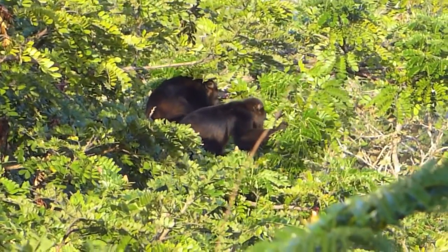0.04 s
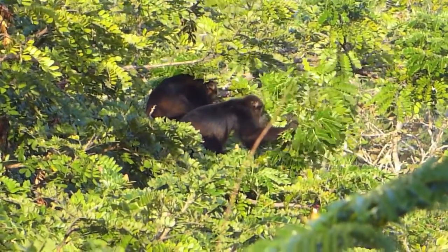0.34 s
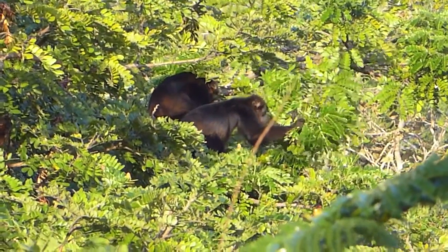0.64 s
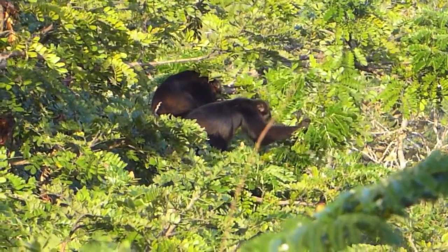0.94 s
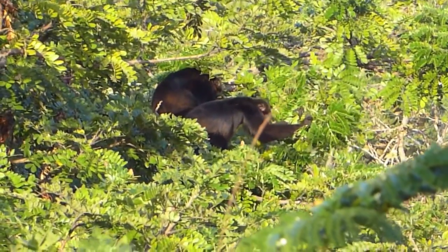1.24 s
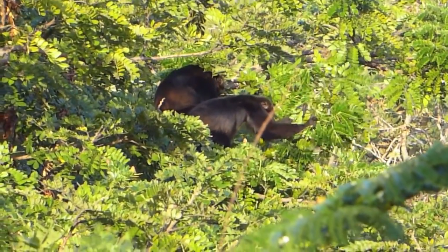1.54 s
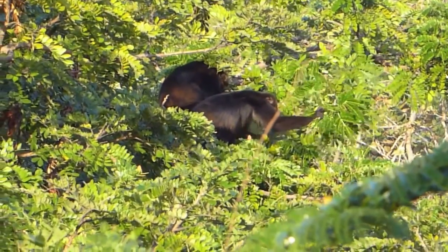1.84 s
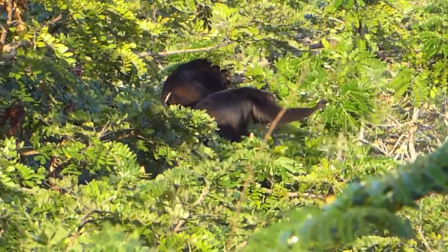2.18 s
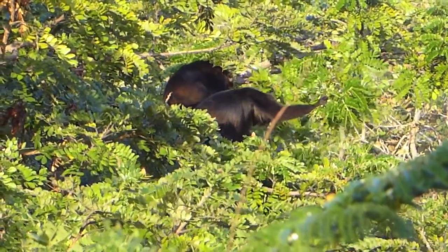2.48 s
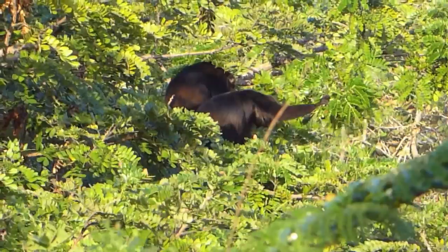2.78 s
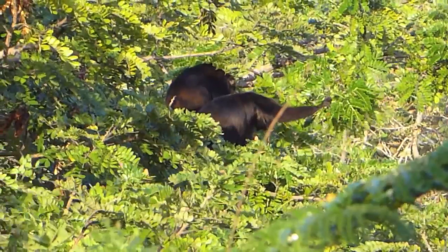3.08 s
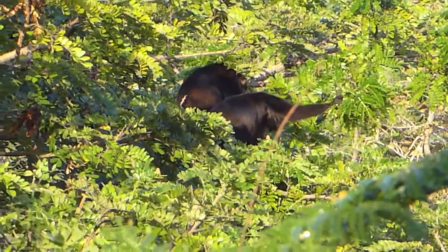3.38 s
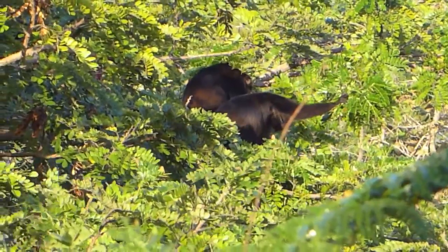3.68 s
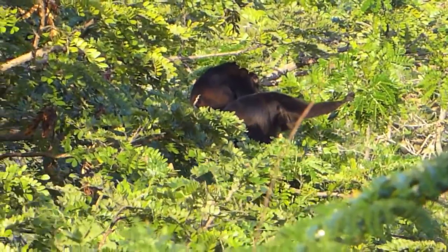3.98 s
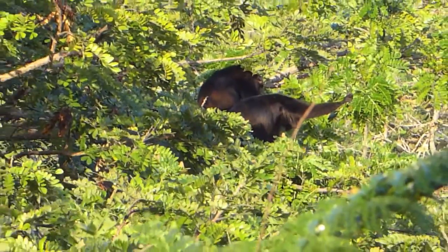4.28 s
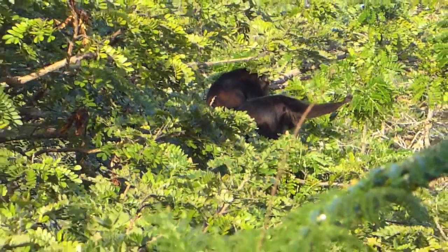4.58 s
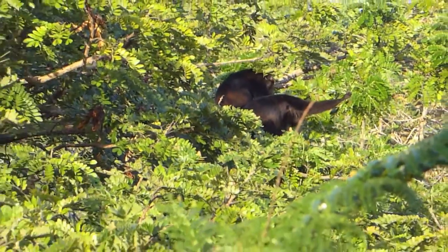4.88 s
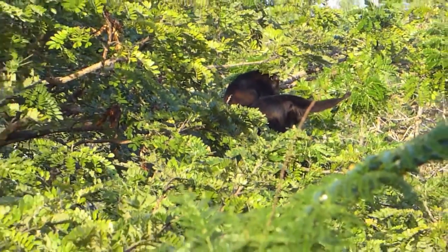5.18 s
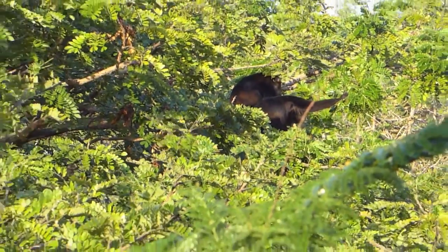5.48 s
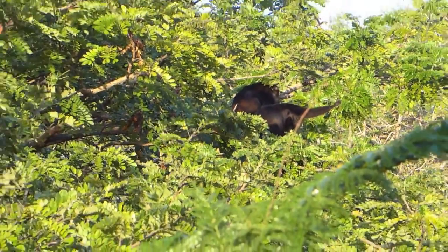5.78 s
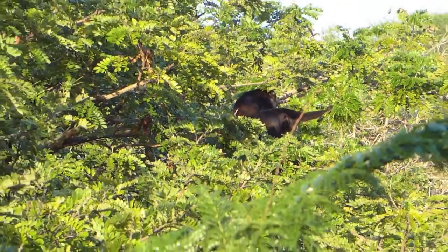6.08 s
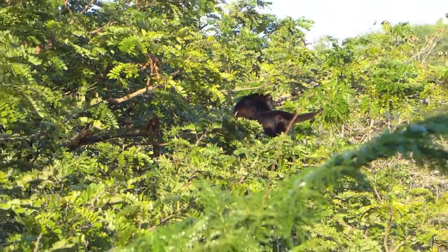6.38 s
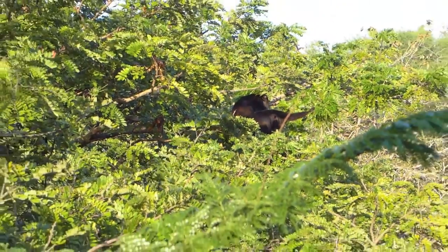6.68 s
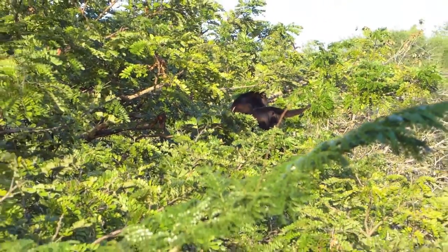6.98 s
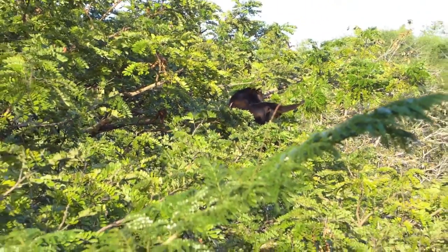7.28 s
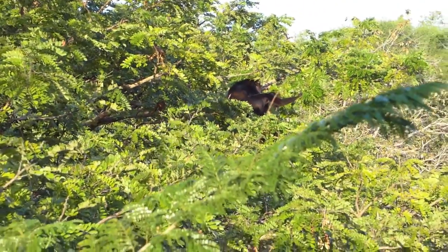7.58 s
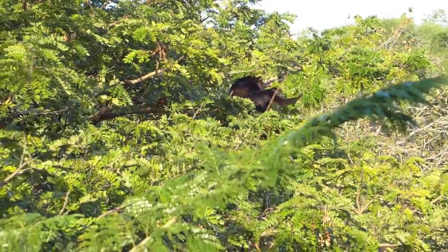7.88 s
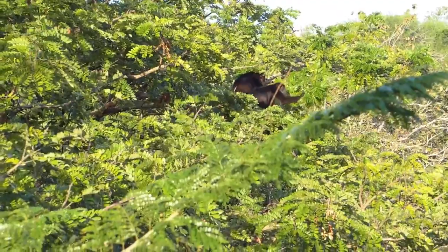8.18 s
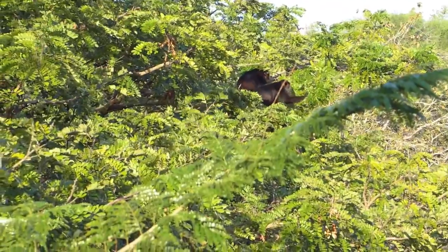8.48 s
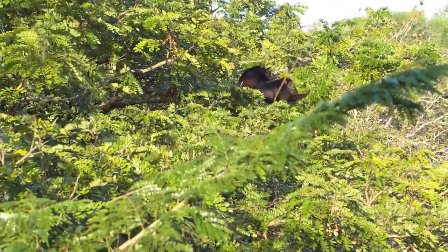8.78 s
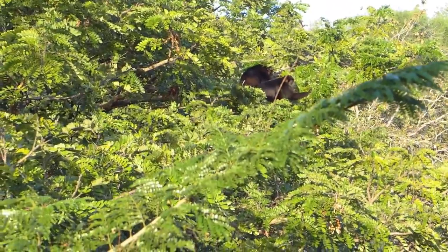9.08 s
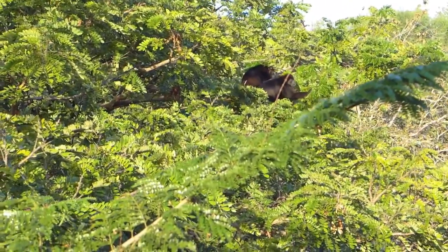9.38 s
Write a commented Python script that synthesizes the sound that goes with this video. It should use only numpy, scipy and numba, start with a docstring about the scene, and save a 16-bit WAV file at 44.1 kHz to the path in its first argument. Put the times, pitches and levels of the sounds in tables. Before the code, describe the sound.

Howler monkeys roar straight ahead from the start, in hoarse, rasping pushes about half a second apart, with falling whoops between them and wavering throat tones inside. The roars are strongest from about 1.5 to 3 seconds, then break into short grunts that spread out until 6 seconds. From 6.5 to 8.5 seconds only weak grunts and faint moans remain; a few firmer grunts return around 9 seconds. A soft breeze stirs the leaves throughout, swelling around 4 to 7 seconds. A faint, high insect buzz comes and goes. Dry twigs snap now and then, most clearly near 4.8, 5.9, 6.4 and 9.1 seconds. A distant bird repeats a short rising whistle from about 3.7 seconds, another chips twice, and faint twittering runs come at about 8 and 9 seconds. The trees give everything a short, diffuse echo.

```python
"""Howler monkeys roar from a treetop: one long hoarse bout that breaks up into single grunts.
Chaotic vocal-fold pulses ring the throat sac and the mouth; rushing air rasps in the upper tract.
Clear throat tones waver within the roars, some softer ones whine through the nose, and falling
whoops and a few faint moans come in between. Around them a breeze stirs the leaves, insects shrill
and buzz, twigs snap and small birds call. Trunks and foliage scatter a short echo."""
import sys
import numpy as np
from scipy import signal
from scipy.fft import rfft, irfft, next_fast_len
from scipy.io import wavfile
from scipy.ndimage import uniform_filter1d
from numba import njit

SR = 44100
rng = np.random.default_rng(int(sys.argv[2]) if len(sys.argv) > 2 else 0)


def wav_out(sig):
    """Save sig, one row per channel (or a flat mono array), as 16-bit PCM at SR to the path in sys.argv[1]."""
    wavfile.write(sys.argv[1], SR, np.round(np.clip(np.atleast_2d(sig).T, -1, 1) * 32767).astype(np.int16))


N = 416744
T = np.arange(N) / SR
SIDE = np.array([[1], [-1]])  # left, right in antiphase


def undb(db):
    """Decibels to gain."""
    return 10 ** (np.asarray(db) / 20)


def curves(table):
    """Table columns, linearly interpolated over the first (time)."""
    times, *columns = np.transpose(table)
    return [np.interp(T, times, column) for column in columns]


def unit(x):
    """Scale to rms 1."""
    return x / np.sqrt(np.mean(x ** 2) + 1e-18)


def steady(x, span_s):
    """Level to rms 1 over each span; faster roughness stays."""
    size = max(int(span_s * SR), 2)
    power = uniform_filter1d(uniform_filter1d(x ** 2, size), size)
    return x / np.sqrt(np.abs(power) + 1e-14)


def walk(rate_hz):
    """Smooth random curve, rms 1."""
    points = rng.standard_normal(8192)
    line = np.interp(T * rate_hz, np.arange(len(points)), points)
    return unit(uniform_filter1d(line, max(int(SR / rate_hz / 2), 1)))


def gate(start, end, attack_s, release_s):
    """1 between two times, with rounded edges."""
    ramp = np.minimum((T - start) / attack_s, (end - T) / release_s) + .5
    return np.sin(np.pi / 2 * np.clip(ramp, 0, 1)) ** 2


def swell(start, end):
    """Sample indices and rounded envelope of an event."""
    at = np.arange(max(int(start * SR), 0), min(int(end * SR), N))
    return at, np.abs(np.sin(np.pi * (T[at] - start) / (end - start))) ** .7


@njit
def bandpass(x, hz, width_hz):
    """State-variable band-pass with a moving centre."""
    y, band_state, low_state = np.empty(len(x)), 0., 0.
    for i in range(len(x)):
        g = np.tan(np.pi * min(hz[i], .45 * SR) / SR)
        damping = width_hz / hz[i]
        band = (band_state + g * (x[i] - low_state)) / (1 + g * (g + damping))
        band_state = 2 * band - band_state
        low_state += 2 * g * band
        y[i] = damping * band
    return y


def ring(x, hz, width_hz):
    """Steep resonance: two band-passes in series, rms 1."""
    hz, width_hz = hz * np.ones(len(x)), float(width_hz)
    return unit(bandpass(bandpass(x, hz, width_hz), hz, width_hz))


def hisses(events, flicker_db=0, flicker_hz=81):
    """Swells of noise, each in its own resonance."""
    out = np.zeros(N)
    noise = rng.standard_normal(N) * undb(flicker_db * walk(flicker_hz))
    for start, end, hz, width_hz, db in events:
        at, shape = swell(start, end)
        out[at] += undb(db) * shape * ring(noise[at], hz, width_hz)
    return out


def tone(hz, waver):
    """Sine with unsteady pitch, rms 1."""
    return np.sqrt(2) * np.sin(2 * np.pi * np.cumsum(hz * (1 + waver)) / SR)


def glides(calls, jitter=.012, hoarse=.7, width_hz=160):
    """Wavering tones in a band of noise, passing through pitches evenly spaced in time."""
    out, waver, air = np.zeros(N), jitter * walk(150), rng.standard_normal(N)
    for start, end, *pitches, db in calls:
        at, shape = swell(start, end)
        hz = np.interp(T[at], np.linspace(start, end, len(pitches)), pitches)
        out[at] += undb(db) * shape * unit(tone(hz, waver[at]) + hoarse * ring(air[at], hz, width_hz))
    return out


def vocal_folds(rate_hz=150, jitter=.55, scatter_db=2, air=.83):
    """Slack folds slap irregularly; air rushes through once a cycle."""
    cycles = np.cumsum(rate_hz * np.exp(jitter * walk(170))) / SR
    slaps = np.diff(np.floor(cycles), prepend=0) * undb(scatter_db * walk(200))
    rush = unit(np.exp(-(cycles % 1) / 1.9) * rng.standard_normal(N))
    return unit(slaps) + air * rush, rush


# side-cavity notches: (centre [Hz], width [Hz])
TRACT_NULLS = [(2980, 900), (5020, 400), (7250, 750)]


def hollow(x, round_trip_s=.00187, reflection=.55, drift=.025):
    """The tract's echo cuts drifting ridges into the rasp; side cavities cut deep nulls."""
    lag_s = round_trip_s * (1 + drift * walk(1.99))
    x = (x + reflection * np.interp(T - lag_s, T, x)) / np.hypot(1, reflection)
    for hz, width_hz in TRACT_NULLS:
        x = x - bandpass(x, np.full(N, float(hz)), float(width_hz))
    return x


# upper tract, mouth at 820 Hz: (centre [Hz], width [Hz], gain [dB], extra at full gape [dB])
TRACT_MODES = [(1210, 205, -32, 18.5), (1561, 99, -33, 9), (2330, 260, -37.5, 10), (4140, 1100, -37.5, 6.5),
               (5540, 300, -38.5, 14), (6085, 550, -27.5, -5), (8100, 1400, -37, 2),
               (11000, 3300, -46, -3.5)]


def upper_tract(rush, mouth_hz, gape, drift=.015):
    """Rushing air rings wandering resonances that rise and change weight as the mouth opens."""
    tuning = (mouth_hz / 820) ** .12
    rasp = sum(undb(db + extra_db * gape) * ring(rush, hz * tuning * (1 + drift * walk(9)), width_hz)
               for hz, width_hz, db, extra_db in TRACT_MODES)
    return hollow(rasp)


def throat_sac(pulses, gape, shut_hz=405.6, rise_hz=86.8):
    """The sac's wavering resonance rises with the gape, above a weaker constant one."""
    hz = (shut_hz + rise_hz * gape) * (1 + .025 * walk(28))
    return steady(ring(pulses, hz, 52) + undb(-9.5) * ring(pulses, 369.7, 40), span_s=.0095)


def mouth_cavity(pulses, rush, hz):
    """A wavering resonance over a breathy lower one; the lips muffle what lies above."""
    waver = 1 + .025 * walk(28)
    cavity = ring(pulses, hz * waver, 80) + undb(-4.5) * ring(rush, .781 * hz, 164)
    return steady(bandpass(cavity, hz, 380.), span_s=.02)


# pushes of air, roars to grunts: (start [s], end [s], level [dB], mouth resonance [Hz])
PUSHES = [(-.05, 0.18, -36, 841), (0.347, 0.71, -31, 834.5), (0.864, 1.035, -31.5, 872),
          (0.985, 1.322, -30.5, 910.5), (1.461, 1.835, -26.5, 847.5), (1.972, 2.334, -25.5, 814),
          (2.396, 2.494, -39.5, 754), (2.513, 2.698, -27.5, 806), (2.828, 2.992, -27.5, 780),
          (2.966, 3.146, -37, 720), (3.186, 3.329, -26, 775), (3.315, 3.517, -32, 736),
          (3.545, 3.689, -28.5, 781), (3.706, 3.874, -34.5, 727), (4.015, 4.17, -29.5, 751),
          (4.367, 4.512, -34, 772), (4.715, 4.867, -29.5, 755), (5.081, 5.336, -35, 747),
          (5.585, 5.739, -29.5, 691), (5.998, 6.128, -29.5, 659), (6.69, 6.85, -40, 607),
          (7.166, 7.278, -42.5, 607), (7.48, 7.72, -44, 616), (8.478, 8.583, -41.5, 768),
          (8.719, 8.832, -33.5, 740), (9.043, 9.181, -29.5, 779), (9.438, 9.54, -40, 757)]
FULL_PUSH_DB, MOUTH_SHUT_HZ, MOUTH_WIDE_HZ = -28.5, 637, 936


def breath(attack_s=.056, release_s=.198, arch_db=4):
    """Each push swells and sags, soft ones with slower edges; returns gain and jaw motion."""
    drive, jaw = np.zeros((2, N))
    for start, end, db, _ in PUSHES:
        sag = np.minimum((2 * (T - start) / (end - start) - 1) ** 2, 2)
        slack = 1 + max(FULL_PUSH_DB - db, 0) / 22
        push = gate(start, end, attack_s * slack, release_s * np.sqrt(slack)) * undb(-arch_db * sag)
        drive += undb(db) * push
        jaw = np.maximum(jaw, push)
    return drive, jaw


def roars(flutter_db=3.5, hop_db=3, jaw_sag=.01, nasal_dip=.115):
    """Each push of air rings sac, mouth, upper tract, nose and chest."""
    effort_db, mouth_hz = curves([(s, db, hz) for start, end, db, hz in PUSHES for s in (start, end)])
    gape = ((mouth_hz - MOUTH_SHUT_HZ) / (MOUTH_WIDE_HZ - MOUTH_SHUT_HZ)) ** 2
    drive, jaw = breath()
    mouth_gain = drive * undb(-4 + 11 * gape)
    mouth_hz = mouth_hz * (1 - jaw_sag * (1 - jaw))
    pulses, rush = vocal_folds()
    sac = drive * throat_sac(pulses, gape)
    mouth = mouth_gain * mouth_cavity(pulses, rush, mouth_hz)
    chest = undb(-31.5) * drive * ring(pulses, 160, 130)
    # air diverted through the nose weakens the rasp
    through_nose = sum(gate(start, end, .14, .028) for start, end, *_ in NOSE_WHINES)
    rasp = jaw * upper_tract(rush, mouth_hz, gape) * undb(-8 * through_nose)
    strain = np.minimum(undb(effort_db - FULL_PUSH_DB), 1) * (1 - gape)
    nasal_hz = 4380 * (1 - nasal_dip * strain)
    nasal = undb(-34.5) * np.tanh(gape / .29) * ring(rush, nasal_hz, 220)
    # powers below 1: soft calls are relatively hoarser
    hoarse = mouth_gain ** .87 * rasp + mouth_gain ** .61 * nasal
    # the flow stutters; energy hops between sac and mouth
    flutter = undb(flutter_db * np.tanh(walk(60)))
    hop = undb(hop_db * np.tanh(walk(40)))
    return flutter * (sac * hop + mouth / hop) + chest + flutter ** .7 * hoarse


# nasal whines: (start [s], end [s], centre [Hz], level [dB])
NOSE_WHINES = [(-.05, 0.183, 4360, -55.5), (0.37, 0.713, 4290, -51), (2.96, 3.18, 4140, -58)]
# their lower resonances: (frequency ratio [1], relative level [dB])
NOSE_LOW_MODES = [(0.364, -4.5), (0.562, -15)]


def whines(width_hz=150):
    """Air in some softer roars rings three resonances of the nose."""
    bands = [(start, end, hz * ratio, width_hz, db + mode_db)
             for start, end, hz, db in NOSE_WHINES for ratio, mode_db in [(1, 0)] + NOSE_LOW_MODES]
    return hisses(bands, flicker_db=3, flicker_hz=58.8)


# breeze strength: (time [s], level before make-up gain [dB])
BREEZE_LEVELS = [(0, -66), (3.2, -65), (4.2, -60.5), (6.06, -57.5), (7.9, -62), (8.1, -66.5), (9.45, -63)]
# foliage noise: (frequency [Hz], relative density [dB])
FOLIAGE_SPECTRUM = [(25, -9.5), (60, -22), (140, 1.5), (250, 3.5), (500, 1), (900, -5.5), (1900, -14.5),
                    (3200, -22), (6500, -20), (10500, -27.5), (15500, -39)]


def breeze(makeup_db=10, side_db=-22, far_steadiness=.95):
    """Wind in foliage: bands swell and flicker; the far treble hiss stays nearly level."""
    hz, db = np.transpose(FOLIAGE_SPECTRUM)
    bin_hz = np.fft.rfftfreq(N, 1 / SR) + 1
    colour = undb(np.interp(np.log(bin_hz), np.log(hz), db))
    mid, side = (unit(irfft(rfft(rng.standard_normal(N)) * colour, N)) for _ in range(2))
    spectrum = rfft(mid)
    edges_hz = np.geomspace(20, SR / 2, num=13)
    breeze_db, = curves(BREEZE_LEVELS)
    gust_db = breeze_db - breeze_db.mean()
    leaves = np.zeros(N)
    for low_hz, high_hz in zip(edges_hz, edges_hz[1:]):
        far = np.interp(low_hz, (1200, 4000), (0, 1))
        flicker_db = np.interp(far, (0, 1), (2.4, 1)) * walk(22)
        band = irfft(spectrum * (bin_hz >= low_hz) * (bin_hz < high_hz), N)
        leaves += band * undb(flicker_db - far * far_steadiness * gust_db)
    return undb(breeze_db + makeup_db) * (leaves + undb(side_db) * side * SIDE)


# single insects: (start [s], end [s], centre [Hz], width [Hz], level [dB])
INSECT_SHRILLS = [(-.15, 0.378, 14400, 2660, -52.5), (5.366, 6.305, 6450, 220, -61),
                  (5.994, 6.2, 9060, 400, -63), (6.227, 6.31, 10300, 2200, -60.5)]
# one insect's repeated buzz: (start [s], end [s], level [dB])
INSECT_BUZZES = [(0.495, 0.702, -54.5), (1.915, 2.218, -59), (3.464, 3.715, -53.5), (4.365, 4.762, -60),
                 (5.144, 5.35, -57.5), (5.763, 6.03, -60), (6.44, 6.57, -59.5), (7.363, 7.706, -64.5),
                 (8.024, 8.1, -62), (8.814, 9.068, -57.5)]


def insects(buzz_hz=6850, buzz_width_hz=180):
    """Fine scraping rings each insect's own resonance."""
    buzzes = [(start, end, buzz_hz, buzz_width_hz, db) for start, end, db in INSECT_BUZZES]
    return hisses(INSECT_SHRILLS + buzzes, flicker_db=1.5)


# upper tract in a whoop: (centre [Hz], width [Hz], gain [dB])
INHALE_MODES = [(3420, 280, -21), (3870, 480, -15), (4550, 700, -21), (5900, 1300, -24), (8500, 5000, -30)]
# whoops: (start [s], end [s], low tone [dB], high tone [dB], high tone's first pitch [Hz])
INHALES = [(0.187, 0.328, -25.5, -38, 880), (0.674, 0.858, -28, -38, 857), (1.3, 1.447, -25.5, -32.5, 1150),
           (1.804, 1.982, -27.5, -31.5, 1115), (2.298, 2.513, -33, -36, 1019),
           (2.691, 2.853, -34.5, -45, 996)]


def whoops(low_hz=461, tiring_hz_per_s=30, lag_s=.055, overlap_s=.03):
    """The in-breath catches on a rough falling tone; a higher one joins late, over a bright rasp."""
    out, air = np.zeros(N), rng.standard_normal(N)
    waver = .01 * walk(160)
    shimmer = undb(3 * np.tanh(walk(60)))
    upper = hollow(sum(undb(db) * ring(air, hz, width_hz) for hz, width_hz, db in INHALE_MODES))
    rasp = upper + undb(-4) * ring(air, 762, 130) + undb(-7.5) * ring(air, 534, 73)
    whistle = undb(-21.5) * ring(air, 2072, 91)
    for start, end, low_db, high_db, high_hz in INHALES:
        low = (start, low_hz - tiring_hz_per_s * start, .83, .42, low_db)
        high = (start + lag_s, high_hz, .86, .7, high_db)
        for onset, top_hz, fall_ratio, hoarse, db in (low, high):
            at, shape = swell(onset, end)
            hz = top_hz * np.interp(T[at], (onset, end), (1, fall_ratio))
            voice = steady(tone(hz, waver[at]) + hoarse * ring(air[at], hz, 85), span_s=.034)
            out[at] += undb(db) * shape * voice
        at, shape = swell(start - overlap_s, end + overlap_s)
        out[at] += undb(high_db) * shape * (rasp[at] + shape * whistle[at])
    return out * shimmer


# throat tones and moans: (start [s], end [s], first pitch [Hz], last pitch [Hz], level [dB])
THROAT_TONES = [(.77, .92, 552.6, 684, -27.5), (.8, .9, 928, 966, -27.5), (1.04, 1.24, 511.6, 501, -23),
                (1.46, 1.495, 445, 438, -19), (1.5, 1.73, 459.5, 481.5, -22.5),
                (1.75, 1.785, 830, 790, -19.5), (1.98, 2.32, 348, 360, -30.5),
                (2.325, 2.385, 2144, 1978, -46.5), (2.56, 2.69, 363, 349.6, -23),
                (2.82, 3.3, 345, 325.6, -32.5), (2.89, 3.01, 449.3, 458.5, -27),
                (3.61, 3.73, 452.8, 440, -26.5), (4.015, 4.17, 420, 398, -26.5),
                (5.28, 5.345, 470, 445, -32.5), (7.21, 7.45, 730, 655, -53), (7.97, 8.08, 680, 632, -54),
                (8.24, 8.3, 440, 418, -48), (8.76, 8.88, 797, 775, -38), (8.79, 8.88, 651, 590, -38),
                (8.85, 8.98, 1010, 944, -58.5)]


def throat_tones(shimmer_db=3):
    """Clear wavering throat tones within the roars and grunts, plus a few faint moans between them."""
    tones = glides(THROAT_TONES, jitter=.016, hoarse=.42, width_hz=120)
    return tones * undb(shimmer_db * np.tanh(walk(45)))


# snaps: (time [s], crack peak [dB], body relative to crack [dB])
TWIG_SNAPS = [(1.3533, -35, -12), (3.7255, -41, -16), (4.7875, -25.5, -17), (5.858, -30, 6.5),
              (6.415, -31.5, -5), (7.639, -40, -5), (9.0907, -28.5, -6), (9.425, -35, -11)]


def twigs(crack_decay_s=.0009, tail_decay_s=.009, tail_db=-21):
    """Dry twigs snap: a bright crack, a woody body, a brief tail."""
    out = np.zeros(N)
    for start, db, body_db in TWIG_SNAPS:
        at, _ = swell(start, start + .064)
        age = T[at] - T[at[0]]
        decay = np.exp(-age / crack_decay_s) + undb(tail_db) * np.exp(-age / tail_decay_s)
        burst = rng.standard_normal(len(at)) * decay
        crack = ring(burst, 6400, 6000)
        body = undb(body_db) * ring(burst, 1980, 1900)
        out[at] += undb(db) * (crack + body) / np.abs(crack).max()
    return out


# whistles: (start [s], length [s], level [dB])
BIRD_WHISTLES = [(3.654, 0.1, -56.5), (5.755, 0.12, -54), (7.394, 0.068, -56), (8.97, 0.088, -58)]


def whistling_bird(pitches_hz=(1980, 2210, 2230)):
    """A far bird repeats a rising whistle."""
    return glides([(start, start + length_s, *pitches_hz, db) for start, length_s, db in BIRD_WHISTLES])


# chips: (start [s], level [dB])
BIRD_CHIPS = [(5.085, -59), (6.614, -60)]


def chipping_bird(length_s=.036, pitches_hz=(7250, 5200, 3700)):
    """A small bird repeats a steeply falling chip."""
    return glides([(start, start + length_s, *pitches_hz, db) for start, db in BIRD_CHIPS])


# twitter runs: (start [s], notes [count], first interval [s], top level [dB])
BIRD_RUNS = [(8.138, 6, .057, -59), (8.866, 11, 0.044, -55.5)]


def twittering_bird(note_s=.0245, slowing_s=.0028, arch_hz=480, arch_db=4):
    """Slowing runs of blurred rising notes; each run climbs, then sinks and fades."""
    notes = []
    for start, count, interval_s, db in BIRD_RUNS:
        for k in range(count):
            onset = start + k * interval_s + slowing_s * k * (k - 1) / 2
            arch = np.exp(-((k - 2.4) / 3.06) ** 2)
            pitches_hz = np.array([4150, 4550, 4650]) + arch_hz * arch
            notes.append((onset, onset + note_s, *pitches_hz, db + arch_db * (arch - 1)))
    return glides(notes, jitter=.01, hoarse=.8, width_hz=500)


# brushing leaves: (start [s], end [s], level [dB])
LEAF_SWISHES = [(9.22, 9.3, -57)]


def leaf_swish(hz=7450, width_hz=5400):
    """Leaves brush in a brief, broad hiss."""
    return hisses([(start, end, hz, width_hz, db) for start, end, db in LEAF_SWISHES])


def canopy_echo(x, t60_s=.55, build_s=.0056, side_db=-5, spread_hz=1800):
    """Trunks and leaves scatter a short diffuse echo; only its treble is wide."""
    age = T[:SR]
    responses = rng.standard_normal((2, SR)) * undb(-60 * age / t60_s) * (1 - np.exp(-age / build_s))
    mid, side = (signal.fftconvolve(x, h / np.linalg.norm(h))[:N] for h in responses)
    side = signal.sosfilt(signal.butter(2, spread_hz, "high", fs=SR, output="sos"), side)
    return mid + undb(side_db) * side * SIDE


def scene():
    """Monkeys and twigs straight ahead; small life with more echo; wind all around."""
    monkeys = throat_tones() + whines() + roars() + whoops()
    small_life = insects() + whistling_bird() + chipping_bird() + twittering_bird() + leaf_swish()
    ahead = monkeys + twigs()
    echo = undb(-16.5) * canopy_echo(ahead) + undb(-9) * canopy_echo(small_life)
    return ahead + small_life + echo + breeze()


def record(dry, ports_hz=1100, ports_db=-20, top_hz=15700):
    """Two microphone ports hear the treble slightly out of phase; the top is cut."""
    highpass = signal.butter(2, ports_hz, "high", fs=SR, output="sos")
    treble = signal.sosfiltfilt(highpass, dry.mean(axis=0))
    quadrature = np.imag(signal.hilbert(treble, next_fast_len(N)))[:N]
    heard = dry + undb(ports_db) * quadrature * SIDE
    return signal.sosfilt(signal.ellip(10, .2, 80, top_hz, fs=SR, output="sos"), heard)


dry = scene()
out = record(dry)
wav_out(out)
```